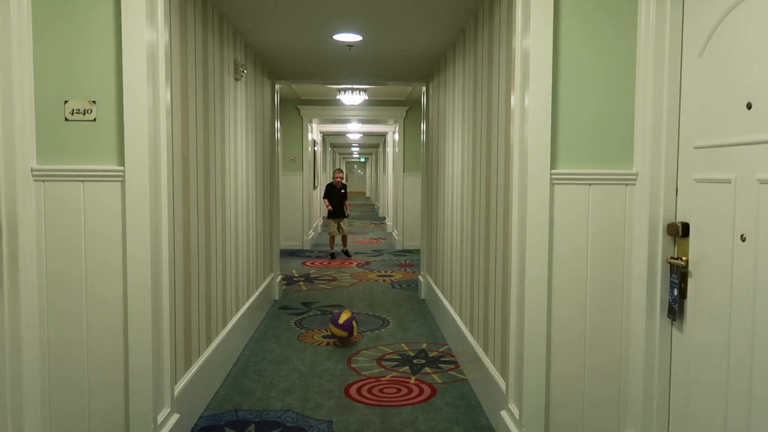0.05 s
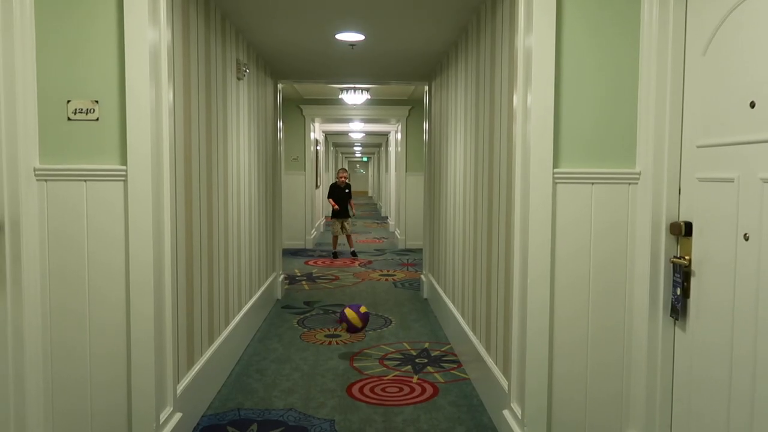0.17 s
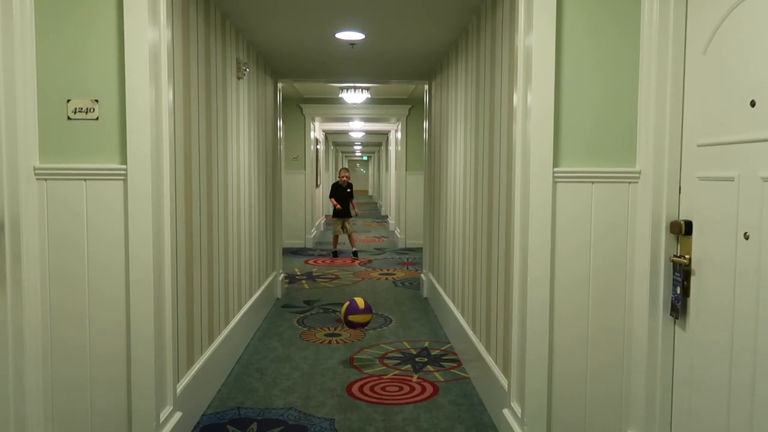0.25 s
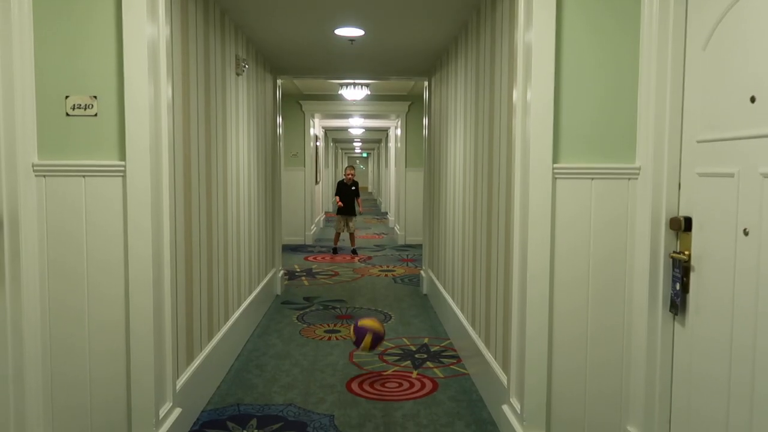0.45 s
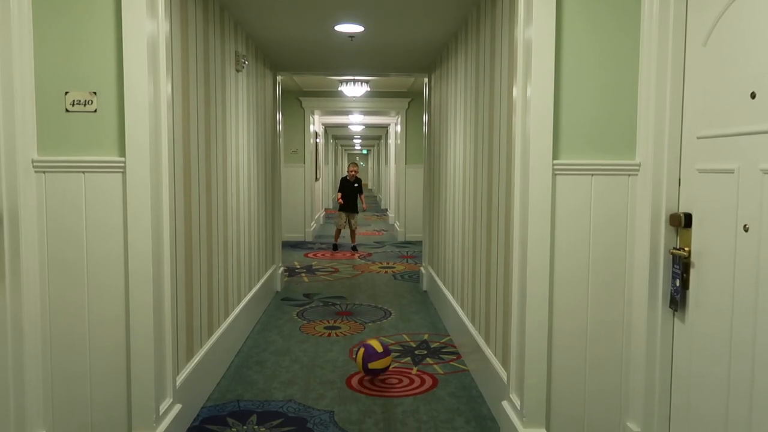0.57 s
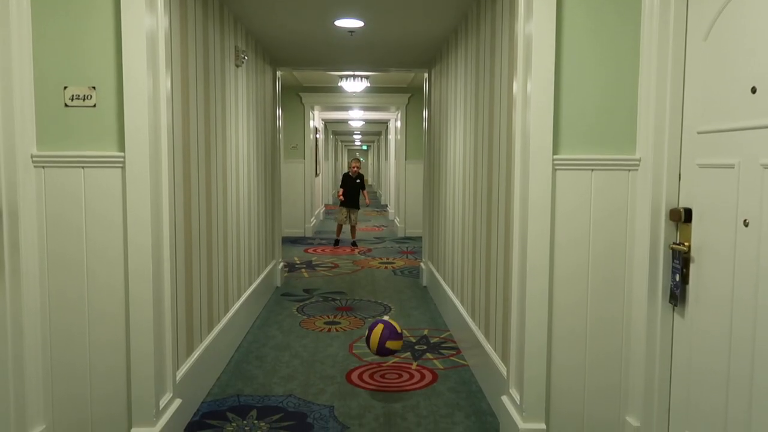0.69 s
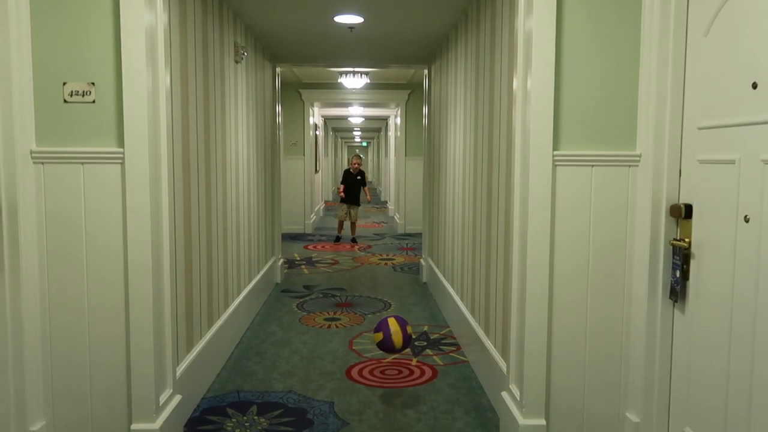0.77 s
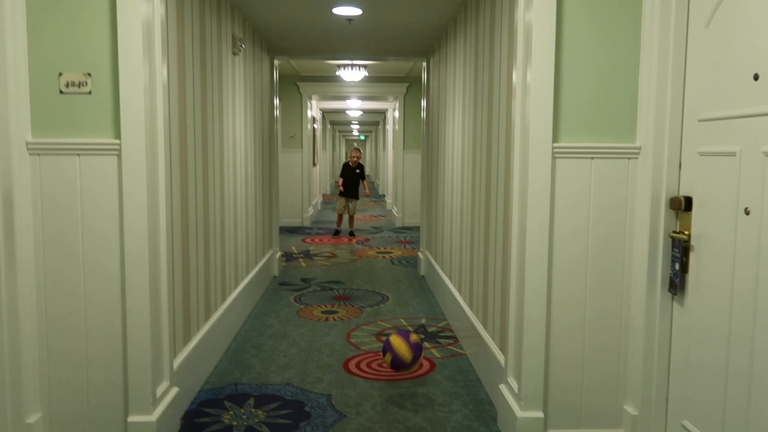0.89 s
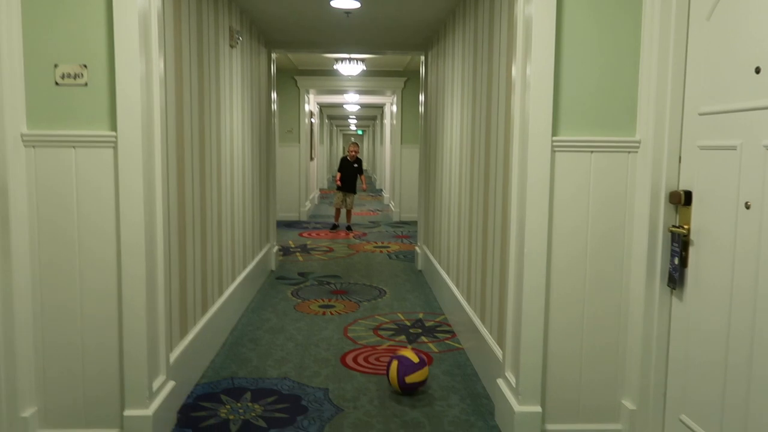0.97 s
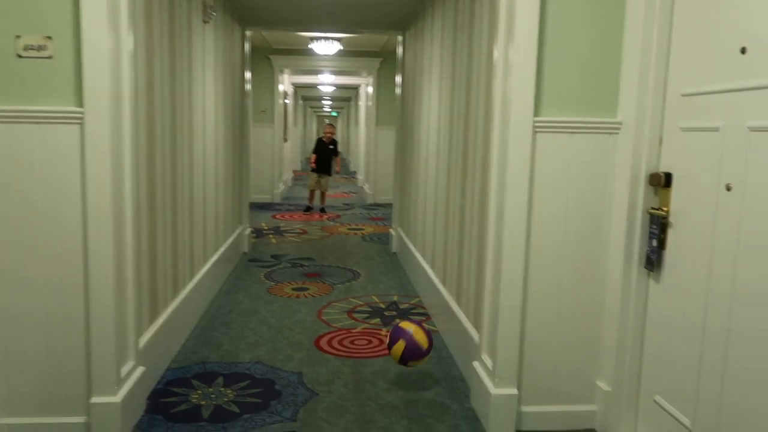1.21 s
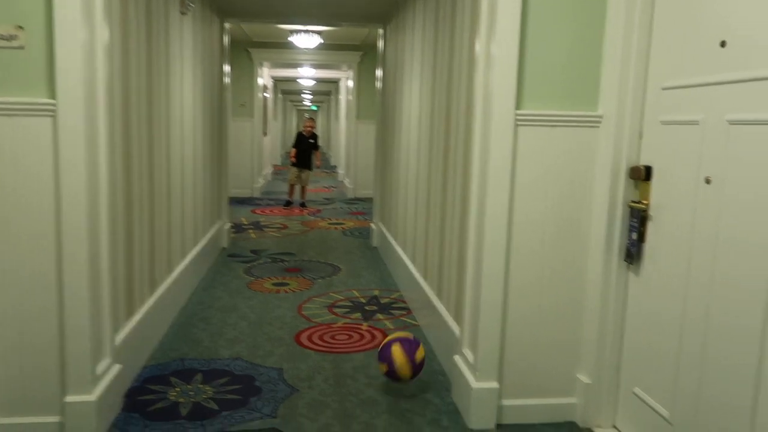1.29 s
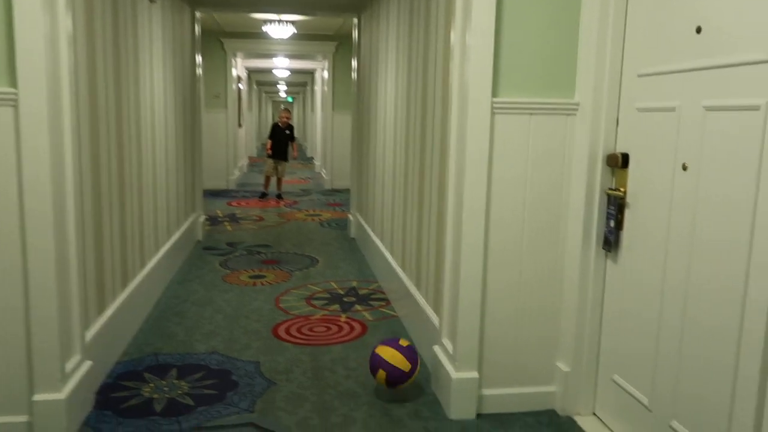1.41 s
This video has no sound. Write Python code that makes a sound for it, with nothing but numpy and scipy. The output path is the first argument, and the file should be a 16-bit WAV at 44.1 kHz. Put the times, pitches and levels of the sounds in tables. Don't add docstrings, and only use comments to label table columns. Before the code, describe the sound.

After the brief dying ping of a kicked ball, three weakening hollow bounces boom down a narrow carpeted hallway, heard by a handheld stereo microphone amid low air rumble, thin hiss and late cloth rustle.

```python
import sys
import numpy as np
from scipy import signal
from scipy.io import wavfile

SR = 44100
rng = np.random.default_rng(int(sys.argv[2]) if len(sys.argv) > 2 else 0)


def gain_from_decibels(decibels):
    exponent = np.asarray(decibels, float) / 20
    return 10 ** exponent


def int16_out(signal):
    q = np.round(np.clip(np.atleast_2d(signal).T, -1, 1) * 32767)
    wavfile.write(sys.argv[1], SR, q.astype(np.int16))


N = 63945
T = np.arange(N) / SR


def rms_one(x):
    return x / np.sqrt(np.mean(x ** 2) + 1e-20)


def at_hz(points, hz):
    table = np.array(points)
    return np.interp(np.log(hz), np.log(table[:, 0]), table[:, 1])


def drift(rate_hz):
    r = np.exp(-80 * np.pi * rate_hz / SR)
    noise = rng.standard_normal(N // 40 + 2002)
    slow = signal.lfilter([1], [1, -2 * r, r * r], noise)[2000:]
    return np.interp(np.arange(N) / 40, np.arange(len(slow)), rms_one(slow))


def ring(push, hz, t60_s):
    r, w = gain_from_decibels(-60 / (t60_s * SR)), 2 * np.pi * hz / SR
    return signal.lfilter([0, np.sin(w)], [1, -2 * r * np.cos(w), r * r], push + 1e-18)


def filtered(x, order, hz, kind):
    return signal.sosfilt(signal.butter(order, hz, kind, fs=SR, output="sos"), x)


# [f/Hz, level/dB]
PORTS = [(40, -60.5), (100, -43.5), (300, -19), (700, -15), (1400, -9.5), (2200, -8), (7500, -6),
         (11500, -5.5)]


def bands(spectrum, shape, side_db):
    edges = 22 * 2 ** np.arange(0, 9.4, 1 / 3)
    centres = np.sqrt(edges[1:] * edges[:-1])
    power = np.sum(gain_from_decibels(2 * at_hz(spectrum, centres)) * np.diff(edges))
    white = rng.standard_normal((2, 2, N + 4000))
    out = 0
    for k, hz in enumerate(centres):
        mid, side = filtered(white[k % 2], 2, edges[k:k + 2], "band")[:, 4000:]
        stereo = mid + gain_from_decibels(at_hz(PORTS, hz) + side_db) * side * [[1], [-1]]
        out = out + gain_from_decibels(at_hz(spectrum, hz)) * shape(hz) * stereo
    return out / np.sqrt(power * 2 / SR)


# [f/Hz, level/dB, t60/s]
PING = [(275, -42, .5), (400, -47, .4), (1275, -51, .25), (2910, -53, .5), (4100, -66, .12),
        (5140, -66, .6)]


def ping():
    end_s, stop_s, sag_per_s, wobble_db = 0.055, 0.003, 0.15, 3.5
    stop = 1 / (1 + np.exp(np.minimum((T - end_s) / stop_s, 50)))
    out = 0
    for hz, db, t60_s in PING:
        level = gain_from_decibels(db - 60 * T / t60_s + wobble_db * drift(60))
        cycles = hz * T * (1 - sag_per_s * T)
        out = out + level * np.sin(2 * np.pi * (cycles + rng.random()))
    return stop * out


# [f/Hz, level/dB per Hz]
AIR = [(15, -32), (25, -3), (104, -4.5), (166, -14.5), (241, -15), (297, -14), (330, -19), (589, -27.5),
       (13500, -57)]


def ventilation():
    def shape(hz):
        lumps_db = (1.38 * drift(4) + 2.0 * drift(5.1)) / np.hypot(1, hz / 600)
        return gain_from_decibels(lumps_db) / np.hypot(1, (hz / 10000) ** 4)
    return gain_from_decibels(-39.5) * bands(AIR, shape, side_db=7.5)


# [f/Hz, level/dB per Hz]
HISS = [(2000, -8), (3500, 11), (6000, -4.5), (9000, -11), (11000, -23), (13500, -10)]


def hiss():
    hiss_db, top_db, top_hz, top_mid_db = -75, -58.5, 12300, -8.5
    mid, top_side = filtered(rng.standard_normal((2, N)), 12, top_hz, "high")
    thin = bands(HISS, lambda hz: 1, side_db=-43)[0]
    side = gain_from_decibels(hiss_db) * thin + gain_from_decibels(top_db) * top_side
    return side * [[1], [-1]] + gain_from_decibels(top_db + top_mid_db) * mid


# [t/s, squash level/dB, corridor level/dB, carpet cutoff f/Hz, tail level/dB]
BOUNCES = [
    (0.2125, -11.5, -11, 2250, -23.5),
    (0.685, -11.5, -13.5, 833, -33),
    (1.1040, -21.5, -18, 791, -35.5),
]
SLAP_HZ = 2000
# [f/Hz, level/dB per Hz]
TAIL = [(90, -14.5), (250, -6.5), (480, -10.5), (800, -10), (1900, -15.5), (2300, -22.5), (4000, -27),
        (9000, -60.5)]
# [f/Hz, t60/s]
TAIL_T60 = [(150, 0.72), (500, 0.71), (1200, 0.55), (2200, 0.53), (3500, 0.32), (8000, 0.21)]


def tails():
    kick_db, rise_s, early_db, early_t60_s = -48.5, 0.005, -7.5, 0.35
    crack_db, crack_hz, crack_t60_s = 9, 3250, 0.16

    def shape(hz):
        t60_s = at_hz(TAIL_T60, hz)
        env = gain_from_decibels(kick_db - 60 * T / t60_s) / np.hypot(1, hz / 1500)
        for s, _, _, dull_hz, db in BOUNCES:
            age = np.maximum(T - s, 0)
            late = gain_from_decibels(-60 * age / t60_s)
            early = gain_from_decibels(early_db - 60 * age / early_t60_s)
            crack = gain_from_decibels(crack_db - 60 * age / crack_t60_s) / np.hypot(1, (crack_hz / hz) ** 3)
            swell = 1 - np.exp(-(age * SLAP_HZ / dull_hz / rise_s) ** 2)
            carpet = np.hypot(1, (hz / dull_hz) ** 2.35)
            env = env + gain_from_decibels(db) * swell * (late + early + crack) / carpet
        return env * gain_from_decibels(2.0 * drift(35))
    return bands(TAIL, shape, side_db=-5.5)


EDGE_FALL_S = 0.0012
# [delay t/s, level/dB, sign or gain]
ECHOES = [
    (0, 0.5, 0.36),
    (.0055, -17.5, 1),
    (0.0119, -4, 1),
    (.021, -8, 1),
]


def contact(s, db, dull_hz):
    rise_s, edge_db, follows = 0.00043, 10, 1.64
    push = 0
    for lag, echo_db, sign in ECHOES:
        age = np.maximum(T - s - lag, 0)
        push = push + sign * gain_from_decibels(echo_db) * (np.exp(-age / EDGE_FALL_S) - np.exp(-age / rise_s))
    push = filtered(push, 2, 1.2 * dull_hz, "low")
    return push, gain_from_decibels(edge_db + follows * db) * push


def squash(s, db):
    hz, peak_s, width_s, rise_s = 101, 0.0112, 0.0062, 0.001
    age = np.maximum(T - s, 0)
    late = age - peak_s
    wavelet = np.cos(2 * np.pi * hz * late) * np.exp(-0.5 * (late / width_s) ** 2)
    return gain_from_decibels(db) * wavelet * (1 - np.exp(-age / rise_s))


# [f/Hz, level/dB, t60/s]
CORRIDOR = [(63, -34, 0.33), (85.5, -9.5, 0.54), (109.9, -2.5, 0.43), (128, -18, 0.6), (243.8, -6.5, 0.87),
            (298.2, 1.5, 0.33), (381.4, 8.5, 0.31)]


def corridor_ring(push, ring_db, tail_db):
    out = 0
    for hz, mode_db, t60_s in CORRIDOR:
        lean_db = (hz > 200) * 0.5 * (tail_db - ring_db + 9.5)
        out = out + gain_from_decibels(ring_db + mode_db + lean_db) * ring(push, hz, t60_s)
    return out / (EDGE_FALL_S * SR)


# [delay t/s, level/dB]
FAR_WALLS = [(.052, -12.5), (.085, -13), (.145, -16.5)]
# [f/Hz, level/dB, t60/s]
BALL = [(425, -9, 0.12), (614, -6.5, .2), (718.5, -5, .25), (756.4, -8.5, 0.32), (890.5, -15.5, 0.51),
        (934, -3, 0.18), (985, -8.5, 0.17), (1203.6, -2.5, 0.14), (1261, -7.5, 0.3), (1298, -25.5, 0.43),
        (1861, 0, 0.35), (1888, 1.5, 0.11), (2409, -8, 0.27), (2850, -9, 0.18)]


def ball_ring(s, dull_hz, tail_db):
    clicks = np.zeros(N)
    for lag, height in [(0.001, 0.3), (0.005, 1), (0.011, 0.7)]:
        clicks[int((s + lag * dull_hz / SLAP_HZ) * SR)] = height
    for lag, echo_db in FAR_WALLS:
        clicks[int((s + lag) * SR)] = gain_from_decibels(echo_db)
    clicks = filtered(clicks, 2, 0.67 * dull_hz, "low")
    out = 0
    for hz, mode_db, t60_s in BALL:
        lean = gain_from_decibels(at_hz(PORTS, hz) - 9) * rng.choice([-1, 1])
        level = gain_from_decibels(tail_db + 0.5 + mode_db + rng.normal(0, 1.1))
        out = out + level * ring(clicks, hz, t60_s) * [[1 + lean], [1 - lean]]
    return out


def thuds():
    out = np.zeros((2, N))
    for s, db, ring_db, dull_hz, tail_db in BOUNCES:
        push, edge = contact(s, db, dull_hz)
        out += squash(s, db) + edge
        out += corridor_ring(push, ring_db, tail_db)
        out += ball_ring(s, dull_hz, tail_db)
    return out


# [t/s, level/dB]
CLOTH = [(.95, -76), (1.04, -66), (1.09, -58), (1.125, -64), (1.24, -64), (1.29, -59), (1.338, -55),
         (1.37, -59), (1.45, -56)]
# [f/Hz, level/dB per Hz]
CLOTH_COLOUR = [(500, -12.5), (1200, 0.5), (1900, 4), (3200, -2), (4200, -13), (5500, -12), (8000, -22),
                (13000, -40)]


def cloth():
    level_db = np.interp(T, *np.transpose(CLOTH))
    grain = drift(53)
    return bands(CLOTH_COLOUR, lambda hz: gain_from_decibels(level_db + 1.5 * grain + 1.5 * drift(30)), side_db=0.1)


def scene():
    return ping() + ventilation() + hiss() + tails() + thuds() + cloth()


def band_limit(x):
    return signal.sosfilt(signal.butter(12, 13700, fs=SR, output="sos"), x)


def record(dry):
    x = filtered(dry, 2, 21.5, "high")
    x = signal.sosfilt(signal.cheby2(16, 50, 13850, fs=SR, output="sos"), x)
    return band_limit(x)


dry = scene()
out = record(dry)
int16_out(out)
```